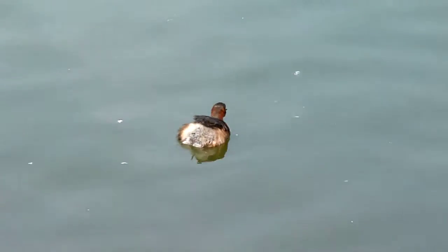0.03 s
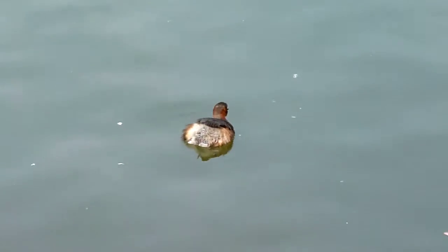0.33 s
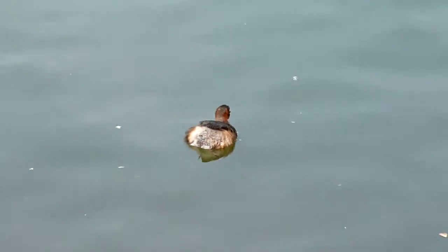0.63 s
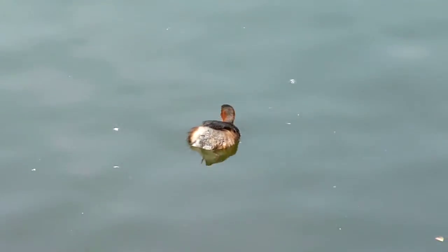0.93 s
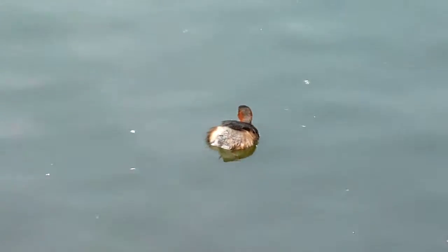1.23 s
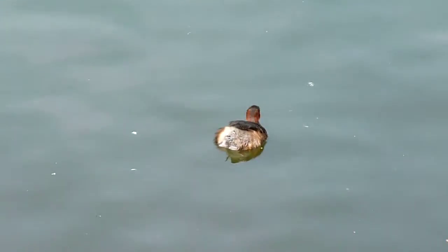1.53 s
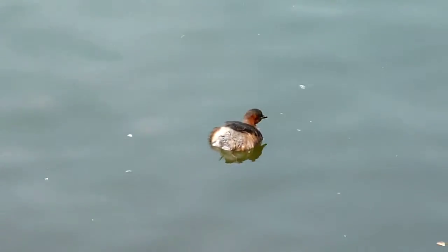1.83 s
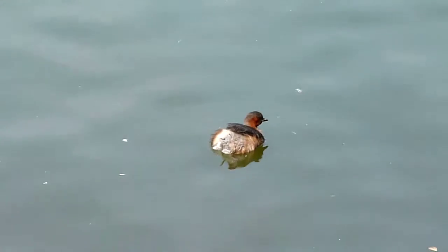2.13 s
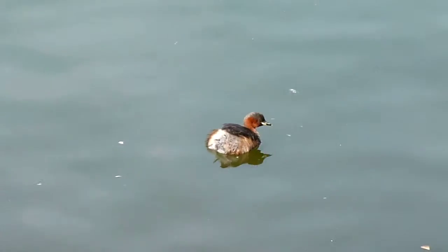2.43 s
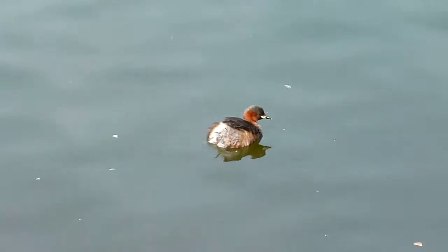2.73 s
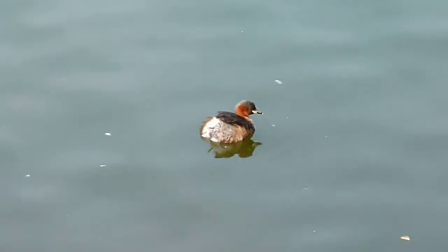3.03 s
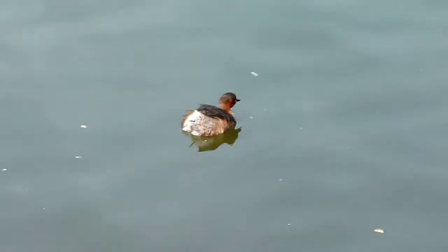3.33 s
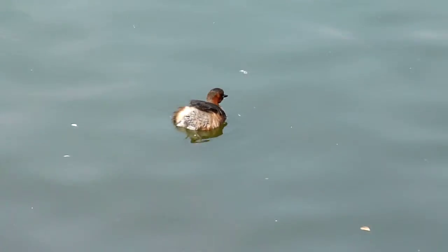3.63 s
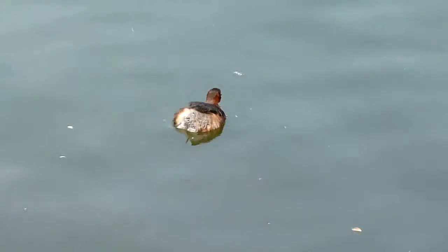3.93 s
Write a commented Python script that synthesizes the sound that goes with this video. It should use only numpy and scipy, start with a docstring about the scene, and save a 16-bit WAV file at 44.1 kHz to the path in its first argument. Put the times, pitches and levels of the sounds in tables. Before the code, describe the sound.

A distant engine knocks rapidly over a low rumble and hum, with faint bird chirps.

```python
"""Machinery across a calm pond

Distant machinery gives a low rumble (shaped noise), a droning hum (wavering tones) and a fast engine
knock, about fourteen blows a second, each a burst of ringing bands trailed by a duller clatter.
Two faint ticks sound nearby, and a small bird gives a few thin chirps, nearly pure gliding tones."""
import sys
import numpy as np
from scipy import signal
from scipy.fft import rfft, irfft
from scipy.io import wavfile
from scipy.ndimage import uniform_filter1d

SR = 44100
rng = np.random.default_rng(int(sys.argv[2]) if len(sys.argv) > 2 else 0)


def int16_out(signal):
    """Quantize to a 16-bit WAV file."""
    q = np.round(np.clip(np.atleast_2d(signal).T, -1, 1) * 32767)
    wavfile.write(sys.argv[1], SR, q.astype(np.int16))


N = 176400
T = np.arange(N) / SR


def amp(db):
    """Amplitude ratio: tenfold for every 20 decibels."""
    return 10 ** (np.asarray(db) / 20)


def unit(x):
    """Normalisation to rms 1."""
    return x / np.sqrt(np.mean(abs(x) ** 2) + 1e-20)


def curve(points):
    """Linear interpolation between (time_s, value) points."""
    return np.interp(T, *np.transpose(points))


def band(x, hz, width_hz):
    """Gaussian band-pass filtering with the given half-power width, at rms 1."""
    f = np.fft.rfftfreq(N, 1 / SR)
    return unit(irfft(rfft(x) * np.exp(-2 * np.log(2) * ((f - hz) / width_hz) ** 2), N))


def noise_band(hz, width_hz):
    """Band-limited Gaussian noise, rms 1."""
    return band(rng.standard_normal(N), hz, width_hz)


def drift(rate_hz):
    """Random fluctuation: low-pass noise, rms 1."""
    return noise_band(0, 2 * rate_hz)


def burst(age, rise_s, decay_s):
    """Envelope of a damped vibration: a smooth rise, then exponential decay."""
    rise = np.sin(np.pi / 2 * np.clip(age / rise_s, 0, 1)) ** 2
    return rise * np.exp(-np.maximum(age - rise_s, 0) / decay_s)


def steadied(x, window_s=0.0031):
    """Division by the running rms evens out the chance swings in the strength of a noise."""
    power = uniform_filter1d(x ** 2, size=int(window_s * SR))
    return unit(x / np.sqrt(abs(power) + 1e-9))


def rumble():
    """Spectrally shaped noise: a distant, gently swelling wash between a deep band and a thin hiss."""
    # spectrum of the wash: frequency_hz, relative_db
    spectrum = [(20, -37.5), (33, -28), (48, -20), (65, -7), (85, -4.5), (130, -3), (165, -3.5), (200, 2),
                (245, 1.7), (280, -2), (380, 0), (470, -5), (560, -7), (620, -4.5), (700, -13), (790, -8),
                (870, -16), (1040, -10.5), (1200, -14.5), (1430, -13), (1620, -17.5), (2000, -18.5),
                (2300, -21), (3150, -24), (3700, -27.5), (5200, -33.5), (6200, -37), (7000, -49.5),
                (7600, -57)]
    # swell of the whole wash, and of its treble alone: time_s, gain_db
    swell = [(0, 0.5), (.3, 1), (.7, 0.6), (1.15, 0), (1.6, 1), (2.05, -0.7), (2.2, 1.5), (2.45, -0.3),
             (3, 1), (3.35, -0.1), (4, 1)]
    treble_gain = [(0, -1), (1, -0.2), (1.8, -1.1), (2.25, .5), (2.7, -1), (3.15, -0.5), (3.5, -2),
                   (4, -1.5)]
    # strength of the deep band and of the hiss: time_s, level_db
    deep_level = [(0, -56.5), (.8, -56), (1.3, -50), (1.8, -45), (2.3, -44.5), (2.8, -48.5), (3.2, -42),
                  (4, -49.5)]
    hiss_level = [(0, -55), (1.2, -54), (1.9, -55), (2.4, -59), (3, -54.5), (3.5, -69), (4, -70)]
    wash_db, patch_db, treble_hz = -25.5, 0.54, 1200
    f = np.fft.rfftfreq(N, 1 / SR)
    hz, db = np.transpose(spectrum)
    cells = signal.stft(rng.standard_normal(N), nperseg=512)[2]
    # faint louder and softer patches, smooth in frequency and then in time
    patches = uniform_filter1d(rng.standard_normal(cells.shape), size=8, axis=0)
    patches = unit(uniform_filter1d(patches, size=20, axis=1))
    wash = signal.istft(cells * amp(patch_db * patches), nperseg=512)[1][:N]
    wash = irfft(rfft(wash) * amp(np.interp(np.log(f + 1), np.log(hz), db)), N)
    treble = irfft(rfft(wash) * f ** 6 / (f ** 6 + treble_hz ** 6), N)
    wash += (amp(curve(treble_gain)) - 1) * treble
    deep = amp(curve(deep_level)) * noise_band(hz=52, width_hz=14)
    hiss = amp(curve(hiss_level)) * noise_band(hz=4720, width_hz=2150)
    return amp(wash_db + curve(swell)) * unit(wash) + deep + hiss


def hum():
    """Random modulation: machine tones wander in pitch, and flutter and fade on their way over water."""
    # slowly fading machine tones: pitch_hz, midway_level_db, unsteady_share
    tones = [(66.5, -44.5, .5), (133.9, -40, 0.5), (623.5, -39.5, .15), (679, -47, .2), (728, -47.5, 0.2),
             (776.5, -46, 0.15), (906, -48, 0.2)]
    # fading in and out of the drone's fundamental and of its octave: time_s, level_db
    fundamental_level = [(0, -27.5), (.35, -27.5), (.7, -39.5), (1.1, -37), (1.45, -32.5), (1.6, -24),
                         (1.72, -39), (1.84, -27), (2.05, -37.5), (2.3, -30), (2.7, -35), (2.95, -31),
                         (3.45, -27), (3.8, -35.5), (4, -37.5)]
    octave_level = [(0, -31), (.25, -28), (.6, -30), (1, -28.5), (1.3, -29), (1.8, -27.5), (2.1, -33.5),
                    (2.28, -25), (2.42, -35), (2.7, -30.5), (3.1, -31), (3.35, -35), (3.65, -34.5),
                    (4, -32.5)]
    drone_hz, flutter_hz, wander, fade_db_per_s = 226.6, 8.5, 0.00194, 0.77
    clock = np.cumsum(1 + wander * drift(rate_hz=2.06)) / SR

    def tone(hz, db, unsteady):
        """Interference of a steady part with a scattered part of random amplitude and phase."""
        flutter = unit(drift(flutter_hz) + 1j * drift(flutter_hz))
        carrier = np.exp(2j * np.pi * (hz * clock + rng.random()))
        return amp(db) * unit(((1 - unsteady + unsteady * flutter) * carrier).real)

    drone = tone(drone_hz, curve(fundamental_level), unsteady=0.33)
    drone += tone(2 * drone_hz, curve(octave_level), unsteady=0.33)
    fade = amp(-fade_db_per_s * (T - T.mean()))
    return drone + fade * sum(tone(*row) for row in tones)


def knocking():
    """Repeated impacts excite damped resonances: each engine cycle knocks, rattles, then clatters."""
    # engine speed: time_s, blows_per_s
    blow_rate = [(0, 14.127), (1.3, 14.089), (1.98, 13.953), (2.11, 12.44), (2.24, 14.119), (2.7, 14.117),
                 (3.4, 13.986), (4, 13.825)]
    # resonances of the knock: centre_hz, width_hz, rattle_relative_db
    resonances = [(1490, 260, -16), (1950, 260, -6), (2500, 520, -14), (3120, 440, -11), (4900, 1600, -12)]
    # strength of the knock: time_s, then level_db for each resonance, lowest first
    knock_levels = [(0, -41.5, -51, -40, -42.5, -47.5), (0.7, -34.5, -41.5, -41.5, -41, -46),
                    (1.3, -39.5, -33.5, -40.5, -40, -56.5), (1.6, -34, -35.5, -41, -55, -48),
                    (1.9, -45.5, -29.5, -36, -39, -41), (2.3, -43.5, -40, -33, -34, -44.5),
                    (2.9, -38.5, -41, -31, -35, -52.5), (3.3, -32, -37.5, -32, -46.5, -41.5),
                    (3.55, -26.8, -38, -34.5, -45, -40.5), (3.75, -33, -36.5, -37.5, -57, -43.5),
                    (4, -31, -35, -44, -52, -38)]
    # clatter after each blow: delay_s, rise_s, decay_s, centre_hz, width_hz, level_db
    clatter = [(.019, 0.012, 0.028, 913, 217, -35), (0.013, .012, 0.027, 1420, 3000, -39.5),
               (.015, 0.0069, 0.011, 4570, 830, -48)]
    # hollow putter after each blow: delay_s, rise_s, decay_s, centre_hz, width_hz
    putter = (.012, .005, 0.01, 1452, 170)
    # strength of the putter: time_s, level_db
    putter_level = [(0, -38), (.75, -30), (1.3, -30.5), (1.9, -31), (2.35, -36), (2.9, -31.5), (3.5, -32),
                    (4, -31)]
    first_blow_cycles, spread_db, alike_share, tail_share = 0.038, 0.4, 0.68, 0.32
    rate = curve(blow_rate)
    cycles = np.cumsum(rate) / SR - first_blow_cycles
    blow = np.floor(cycles).astype(int) + 1

    def age(delay_s=0):
        """Periodic time: seconds since the point in the cycle that lags the blow by delay_s."""
        return (cycles - delay_s * rate) % 1 / rate

    def ring(hz, width_hz):
        """A resonance driven by noise that is partly the same at every blow and partly fresh."""
        same = rng.standard_normal(N)[(age() * SR).astype(int)]
        drive = np.sqrt(alike_share) * same + np.sqrt(1 - alike_share) * rng.standard_normal(N)
        strength = amp(spread_db * rng.standard_normal(size=100)[blow])
        return strength * steadied(band(drive, hz, width_hz))

    strike = (1 - tail_share) * burst(age(), rise_s=0.003, decay_s=0.0025)
    strike += tail_share * burst(age(), rise_s=0.003, decay_s=0.008)
    rattle = burst(age(delay_s=0.011), rise_s=0.0066, decay_s=0.021)
    times, *levels = np.transpose(knock_levels)
    out = np.zeros(N)
    for (hz, width, rattle_db), db in zip(resonances, levels):
        envelope = strike + amp(rattle_db) * rattle
        out += amp(np.interp(T, times, db)) * envelope * ring(hz, width)
    for delay, rise, decay, hz, width, db in [*clatter, (*putter, curve(putter_level))]:
        out += amp(db) * burst(age(delay), rise, decay) * ring(hz, width)
    return out


def ticks():
    """Heavily damped transients: tiny bright bursts of noise that die at once."""
    # ticks, the last two rows heard as one: start_s, level_db, decay_s, centre_hz, width_hz
    transients = [(0.477, -32.5, 0.0057, 3700, 1500), (1.835, -34, .004, 4500, 2400),
                  (1.842, -42, 0.011, 4800, 2400)]
    return sum(amp(db) * burst(T - start, rise_s=0.00038, decay_s=decay) * noise_band(hz, width)
               for start, db, decay, hz, width in transients)


def surges():
    """Narrow-band noise wavers as its components beat; each band swells once in a half-sine arch."""
    # brief swells in the rumble: start_s, length_s, centre_hz, width_hz, level_db
    swells = [(2.14, .12, 580, 170, -29.5), (2.6, .32, 900, 160, -37), (3.17, .44, 815, 65, -37)]
    return sum(amp(db) * np.sin(np.pi * np.clip((T - start) / length, 0, 1)) * noise_band(hz, width)
               for start, length, hz, width, db in swells)


def bird():
    """Frequency modulation: short, nearly pure notes glide in pitch with a slight random quaver."""
    # the bird's notes: start_s, length_s, from_hz, to_hz, level_db
    chirps = [(2.338, 0.02, 5120, 5350, -31.5), (3.008, 0.023, 5350, 5560, -40.5),
              (3.022, 0.03, 2930, 2860, -42), (3.07, .25, 4900, 4990, -52), (3.15, .05, 2960, 2850, -43),
              (3.749, 0.026, 5675, 5705, -32.3)]
    quaver = 1 + 0.0049 * drift(rate_hz=92)
    out = np.zeros(N)
    for start, length, from_hz, to_hz, db in chirps:
        progress = np.clip((T - start) / length, 0, 1)
        hz = (from_hz + (to_hz - from_hz) * progress) * quaver
        out += amp(db) * np.sin(np.pi * progress) * np.sin(2 * np.pi * np.cumsum(hz) / SR)
    return out


def scene():
    """Superposition: the pressures of all sources add at one point."""
    return (rumble() + hum() + knocking() + surges() + bird() + ticks())[None]


def record(dry):
    """Band limiting: a steep low-pass filter removes the highest treble."""
    cutoff_hz = 7400
    low_pass = signal.firwin(401, cutoff_hz, window=("kaiser", 9), fs=SR)
    return signal.oaconvolve(dry, low_pass[None], "same")


dry = scene()
out = record(dry)
int16_out(out)
```